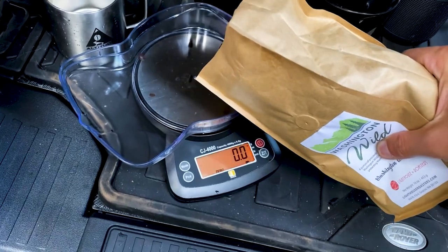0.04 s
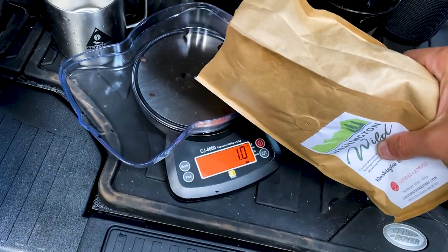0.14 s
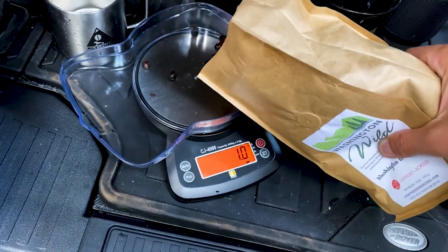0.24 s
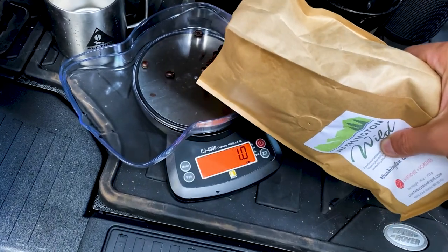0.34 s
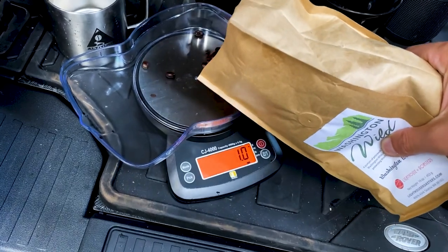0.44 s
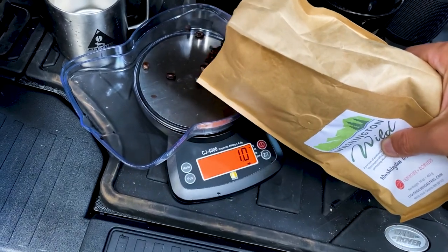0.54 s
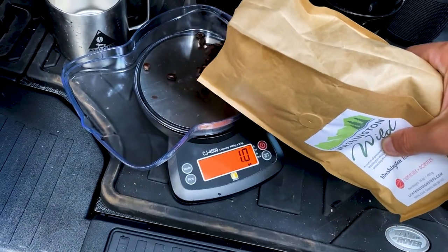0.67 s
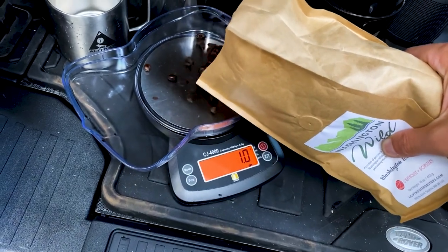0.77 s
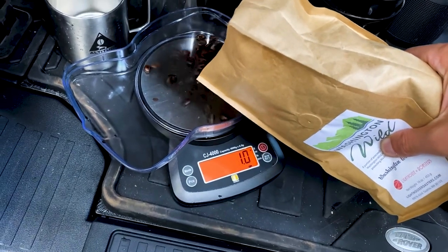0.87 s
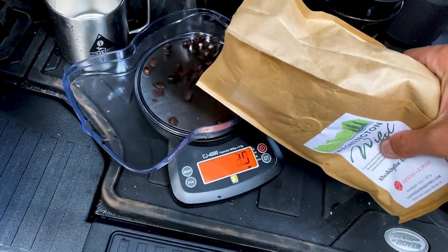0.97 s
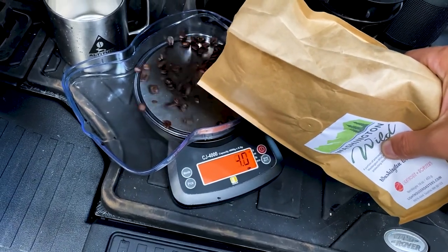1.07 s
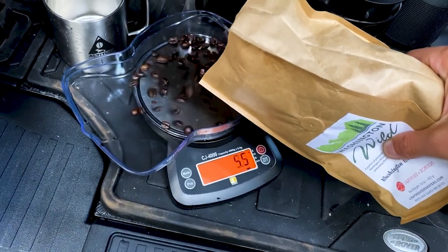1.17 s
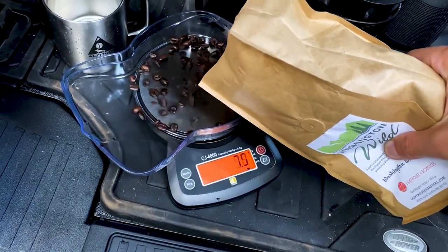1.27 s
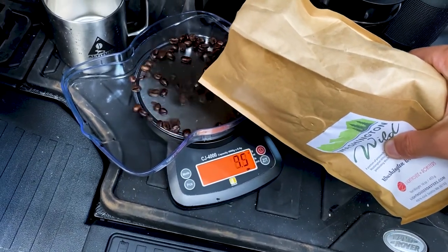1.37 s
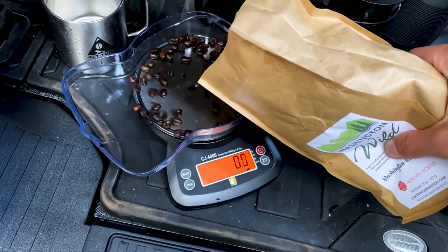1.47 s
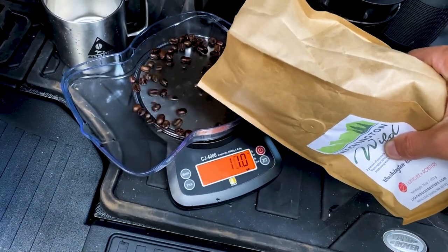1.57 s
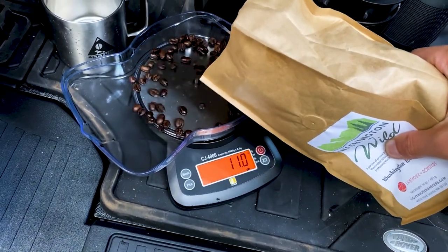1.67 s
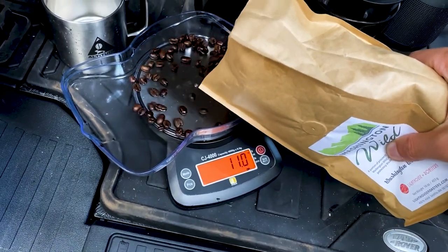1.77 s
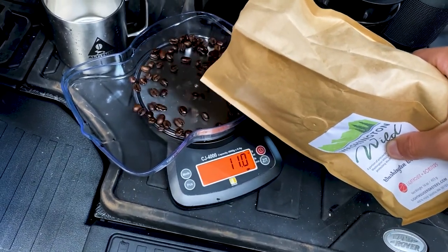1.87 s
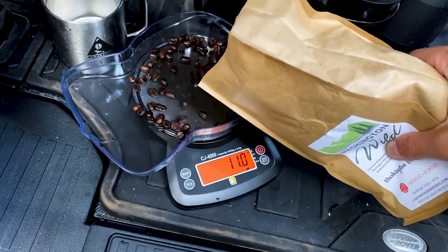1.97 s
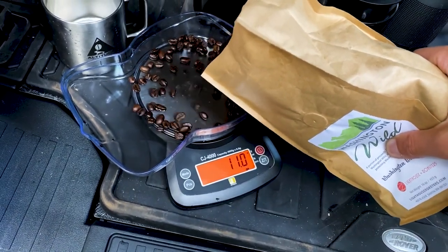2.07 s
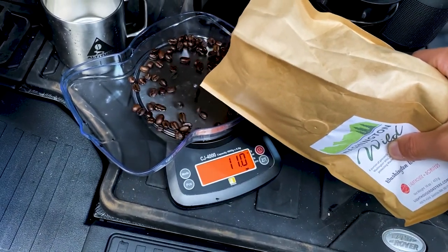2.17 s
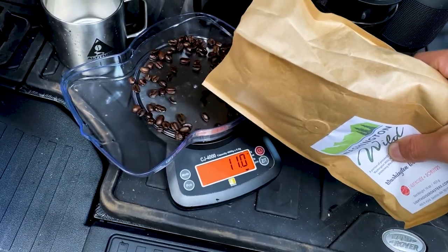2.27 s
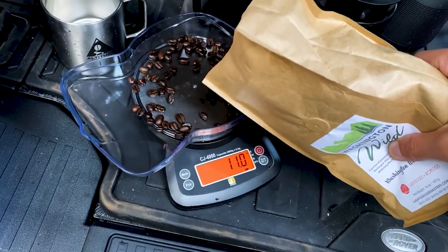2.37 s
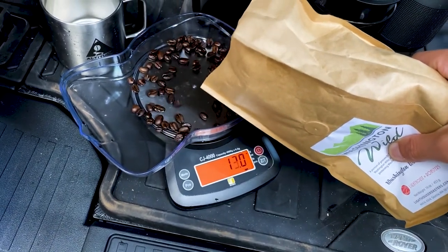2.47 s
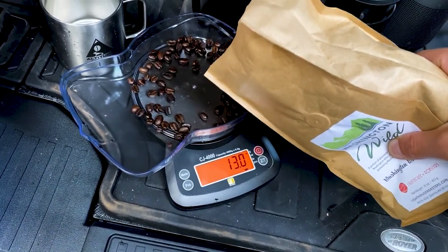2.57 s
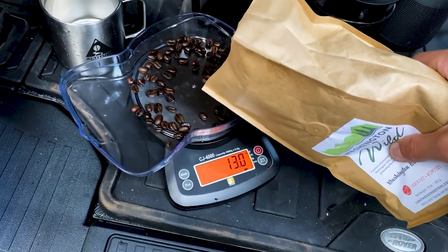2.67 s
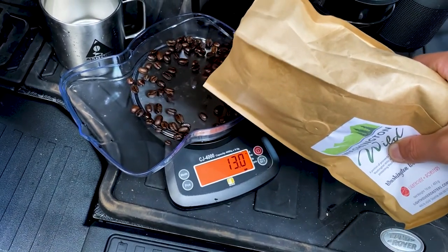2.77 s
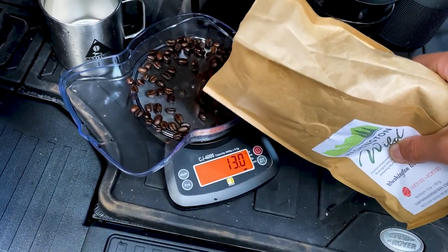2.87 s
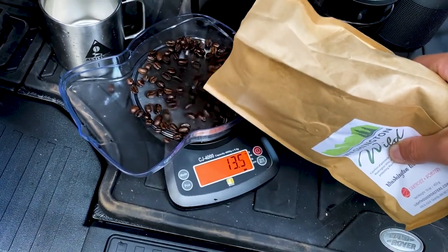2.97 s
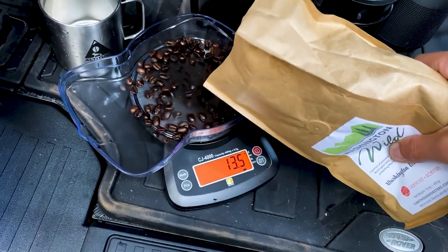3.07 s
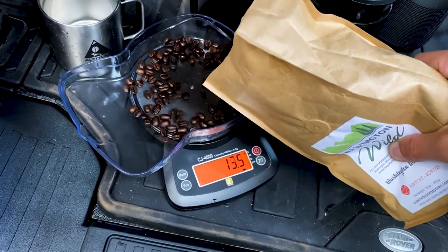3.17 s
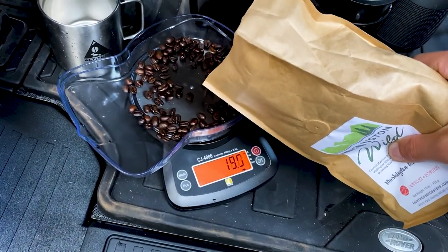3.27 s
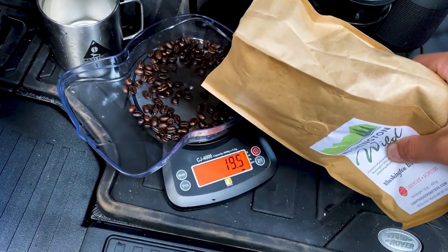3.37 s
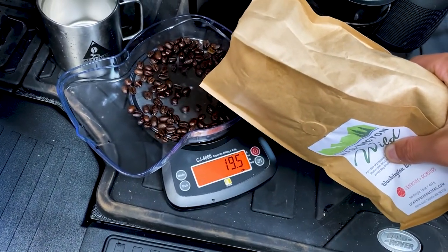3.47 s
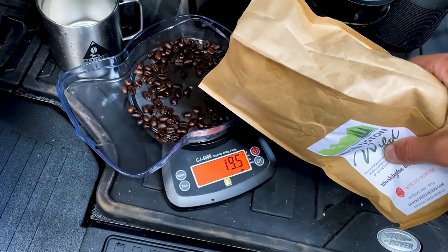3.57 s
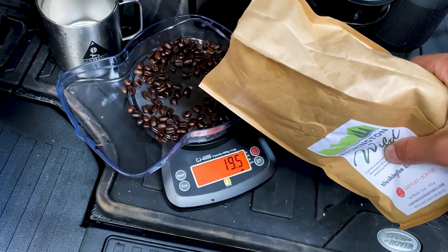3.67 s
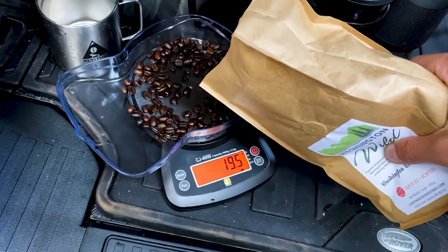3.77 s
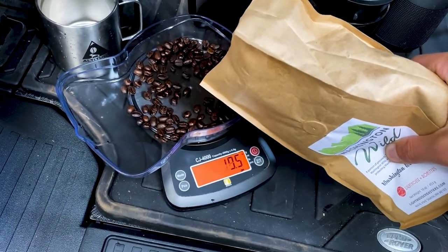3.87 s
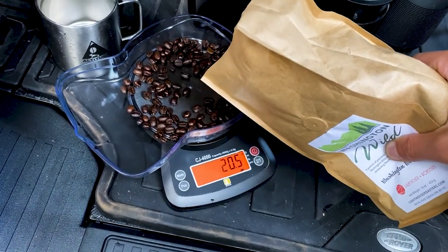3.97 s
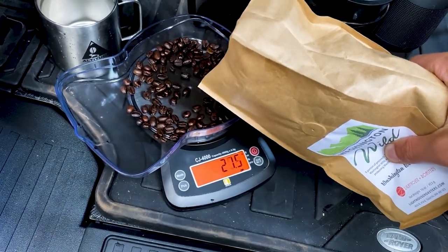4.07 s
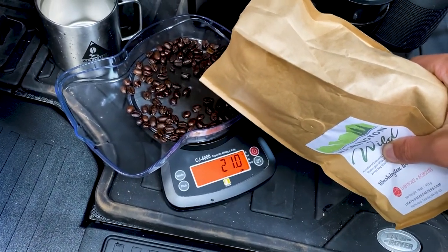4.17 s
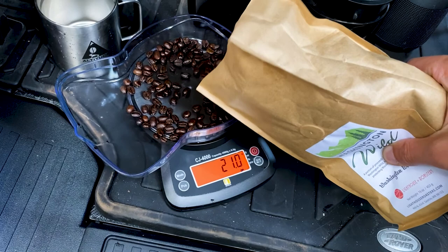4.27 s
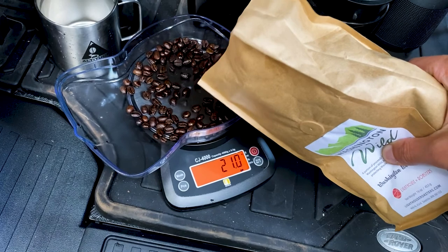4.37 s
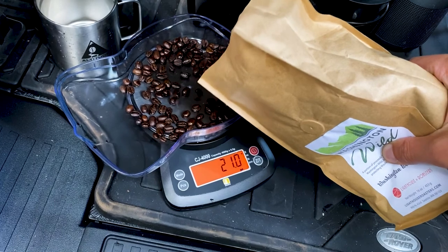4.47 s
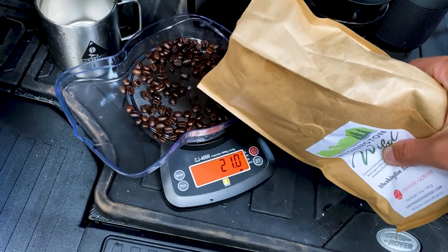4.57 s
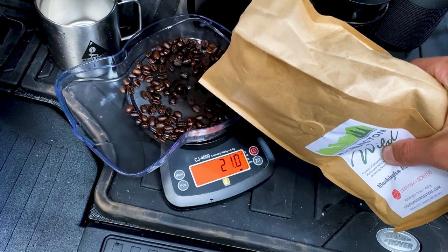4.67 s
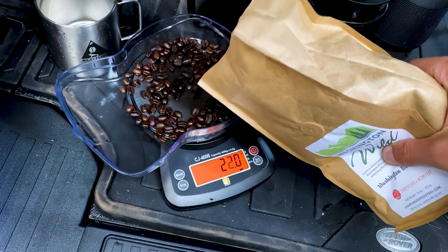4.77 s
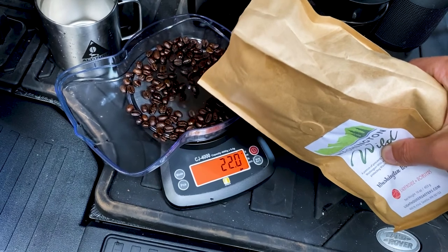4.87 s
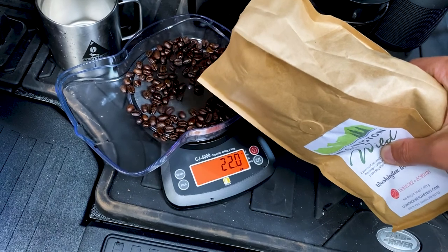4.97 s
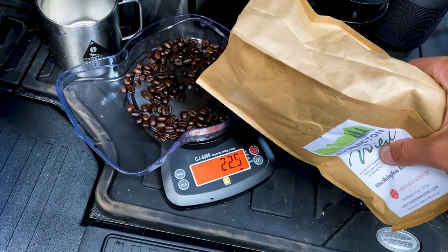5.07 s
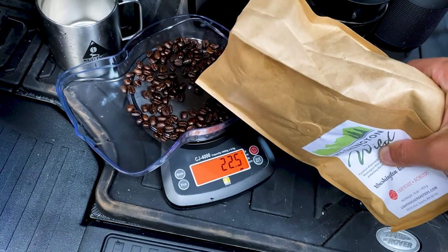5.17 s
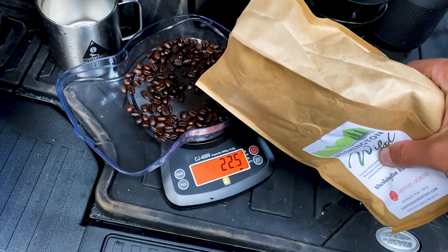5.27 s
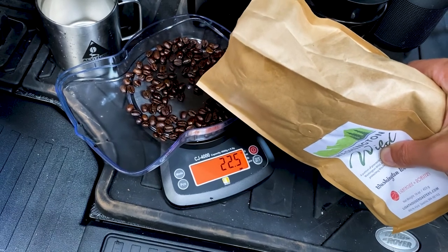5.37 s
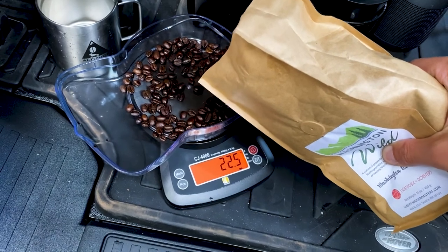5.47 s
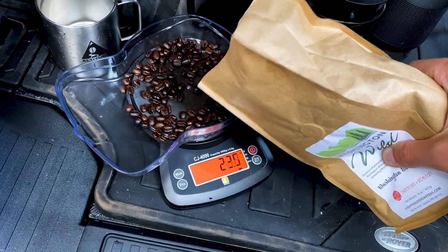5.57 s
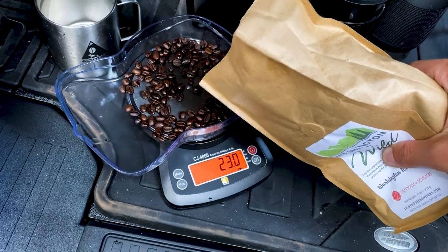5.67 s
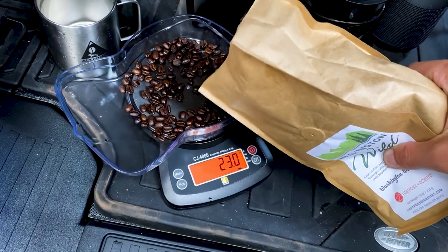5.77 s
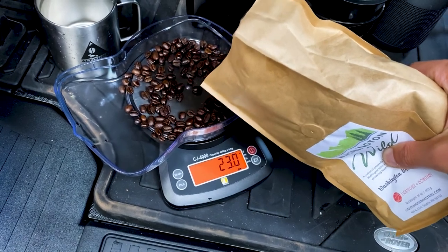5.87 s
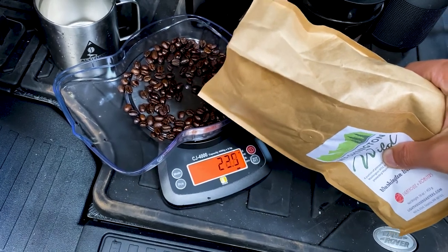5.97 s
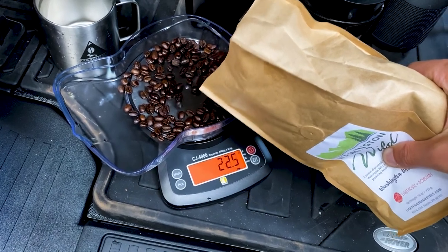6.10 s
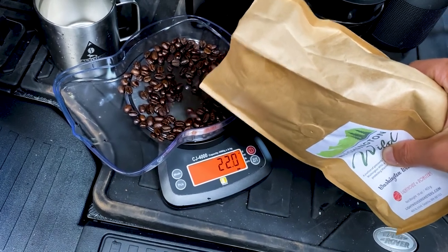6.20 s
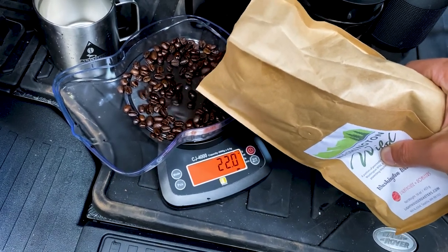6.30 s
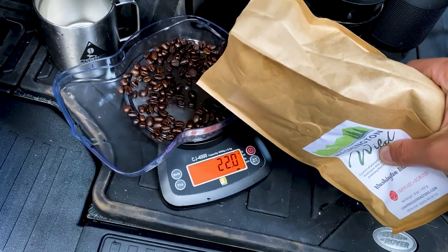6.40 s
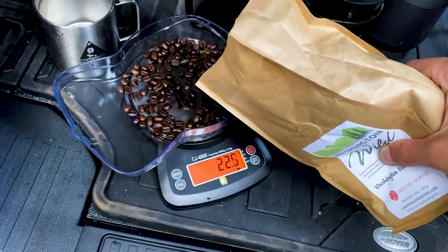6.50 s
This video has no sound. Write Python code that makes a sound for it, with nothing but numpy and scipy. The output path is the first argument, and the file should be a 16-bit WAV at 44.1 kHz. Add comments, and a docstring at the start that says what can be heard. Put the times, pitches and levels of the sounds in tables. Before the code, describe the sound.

Close, dry stereo in a still car cabin with faint low air. From 0 s coffee beans fall from a paper bag into a thin plastic tray, scattered sharp cracks over soft low handling bumps. From about 0.7 to 1.8 s they thicken into a dense, crisp rattle, each hit ringing briefly and hopping. Looser clatter continues to 2.45 s, then a short lull. At 2.8 s a hard burst arrives, strongest near 3 s, thinning into separate knocks until 3.6 s, with a hollow rub of beans in the bag. Near quiet follows from 3.8 s; a paper tick at 4.3 s leads to another spurt from 4.4 to 4.95 s. It dies to tiny clicks. In the lull, a barely audible far bird gives gliding whistles at 5.3-5.7 s, and paper ticks near 5.9 s. A last short clatter runs from 6.15 to 6.4 s, fading at 6.5 s.

```python
"""Roasted coffee beans are shaken in spurts from a paper bag into a thin plastic tray on a scale, in a quiet car.
Each bean lands with a dry crack of noise, a duller wash and decaying sine modes of the tray, then hops once.
Other beans tumble among them in random small collisions. In the bag, beans slide with a hollow rub,
crackle the paper and tick against it. Soft bumps and low handling rumble lie underneath, as short sine swells
and coloured noise, over still cabin air; a faint, far bird whistles in gliding notes."""
import sys
import numpy as np
from scipy import signal
from scipy.fft import rfft, irfft
from scipy.io import wavfile

SR = 44100
rng = np.random.default_rng(int(sys.argv[2]) if len(sys.argv) > 2 else 0)


def wrap_up_sound(samples):
    """Save the sound to the file named by the first command line argument, as 16-bit audio."""
    columns = np.atleast_2d(samples).T
    # keep every value between -1 and 1, then stretch to whole-number steps
    tamed = np.clip(columns, -1, 1)
    steps = np.round(tamed * 32767).astype(np.int16)
    wavfile.write(sys.argv[1], SR, steps)


N = 288414
STRIKE_SIZE = 6144  # samples in one strike or tick


def from_db(db):
    """Decibels to gain."""
    return 10 ** (np.asarray(db) / 20)


def in_time(rows):
    """Draws straight lines between (s, value) rows, giving a value at every sample."""
    return np.interp(np.arange(N) / SR, *np.transpose(rows))


def at_hz(points, hz):
    """Reads a spectrum on a log-frequency axis."""
    knots, values = np.transpose(points)
    return np.interp(np.log(hz + 1e-9), np.log(knots), values)


def cut(x, hz, kind, order=2):
    """Butterworth low- or high-pass."""
    return signal.sosfilt(signal.butter(order, min(hz, .45 * SR), kind, fs=SR, output="sos"), x)


# Likeness of the two microphone ports. Each row: frequency in Hz, correlation from 0 to 1.
PORT_LIKENESS = [(500, 0.7), (2500, 0.47), (5200, 0.32), (8000, 0.98)]
# Balance of the ports. Each row: frequency in Hz, left minus right in dB.
PORT_BALANCE = [(100, -0.5), (1500, -2), (6000, -2.5), (8000, 0.5)]


def noise(spectrum, size, bumps_db=0):
    """Stereo noise of rms 1 with the given colour and random broad bumps in its spectrum."""
    hz = np.fft.rfftfreq(size, 1 / SR)
    mid, side = rfft(rng.standard_normal((2, size)))
    alike = np.clip(at_hz(PORT_LIKENESS, hz), 0, 1)
    signs = np.array([[1], [-1]])  # left, right
    pair = np.sqrt(1 + alike) * mid + np.sqrt(1 - alike) * side * signs
    knots = np.geomspace(500, 16000, 22)
    bump_curve = np.interp(hz, knots, rng.standard_normal(len(knots)))
    colour_db = at_hz(spectrum, hz) + bumps_db * bump_curve + signs * at_hz(PORT_BALANCE, hz) / 2
    x = irfft(pair * from_db(colour_db), size)
    return x / np.sqrt(np.mean(x ** 2))


def play(hits, strikes, split_hz=6800):
    """Lays a strike at each (s, dB, tilt dB); a positive tilt lifts the treble, a negative one dulls it."""
    body = cut(strikes, split_hz, "low", order=1)
    treble = strikes - body
    out = np.zeros((2, N + STRIKE_SIZE))
    for k, (s, level_db, tilt_db) in enumerate(hits):
        at = int(np.clip(s * SR, 0, N - 1))
        spot = k % len(strikes)
        tilt = from_db(np.clip(tilt_db, -10, 10))
        tilted = (body[spot] + tilt * treble[spot]) / np.sqrt((1 + tilt ** 2) / 2)
        out[:, at:at + STRIKE_SIZE] += from_db(level_db) * tilted
    return out[:, :N]


# Colour of the still air in the car. Each row: frequency in Hz, relative level in dB per Hz.
CABIN_COLOUR = [(30, -2.5), (60, 9.5), (250, -7), (600, -9), (1500, -23), (5000, -43.5), (15000, -45)]


def cabin_air(level_db):
    """The still air of the cabin is steady, mostly low noise."""
    return from_db(level_db) * noise(CABIN_COLOUR, N)


# Swell of the handling rumble. Each row: time in seconds, relative level in dB.
RUMBLE_SWELL = [(0, -40), (.56, -50.5), (.68, -53), (2.45, -64), (2.95, -48), (3.15, -63.5), (4.6, -67),
                (4.95, -62), (5.2, -76), (5.95, -58.5), (6.54, -80)]
# Colour of the rumble. Each row: frequency in Hz, relative level in dB per Hz.
RUMBLE_COLOUR = [(20, -25.5), (52, 1), (100, -4.5), (170, -12), (400, -43), (2000, -75.5)]


def handling_rumble(trim_db):
    """Handling makes a deep noise that rises and sinks along its swell."""
    return from_db(in_time(RUMBLE_SWELL) + trim_db) * noise(RUMBLE_COLOUR, N)


# Calls of the far bird. Each row: start in seconds, level in dB.
BIRD_CALLS = [(5.285, -75), (5.485, -73), (5.69, -73)]
# The rising and the falling note of a call. Each row: delay in seconds, length in seconds,
# first pitch in Hz, last pitch in Hz, level within the call in dB.
BIRD_NOTES = [(0, .05, 4150, 4480, -8), (.055, .06, 4680, 4400, 0)]


def bird():
    """Each note is a thin, gliding whistle that swells and fades."""
    out = np.zeros(N)
    for s, call_db in BIRD_CALLS:
        for delay, length, first_hz, last_hz, note_db in BIRD_NOTES:
            hz = np.linspace(first_hz, last_hz, int(length * SR))
            at = int((s + delay) * SR)
            whistle = np.hanning(len(hz)) * np.sin(2 * np.pi * np.cumsum(hz) / SR)
            out[at:at + len(hz)] += from_db(call_db + note_db) * whistle
    return out


# Soft bumps of the hand jogging the bag, and of beans shifting in it.
# Each row: centre in seconds, peak of the swell in dB, pitch in Hz.
BUMPS = [(0.019, -31, 79.4), (.096, -25.5, 64.5), (0.18, -33, 63), (0.36, -31, 58.6), (.461, -36.5, 67.4),
         (1.802, -39, 111), (2.104, -41.5, 189.9), (2.222, -38, 244), (2.724, -41, 299),
         (2.917, -30, 102.3), (3.017, -36, 112.2), (3.952, -42, 58), (4.347, -45, 296)]


def bumps(cycles):
    """Each bump is a low swell a cycle or two long, at a random phase."""
    out, t = np.zeros(N), np.arange(N) / SR
    for s, peak_db, hz in BUMPS:
        near = abs(t - s) < .1
        turns = (t[near] - s) * hz
        swell = from_db(peak_db) * np.exp(-(turns / cycles) ** 2)
        out[near] += swell * np.sin(2 * np.pi * (turns + rng.random()))
    return out


# Beans sliding in the paper bag. Each row: time in seconds, level of the rub before its scuffs in dB.
BAG_SLIDE = [(0, -49), (2.6, -58), (2.72, -49.5), (3.7, -58.5), (3.97, -80.5), (4.2, -76), (4.31, -52),
             (4.42, -64), (5.1, -65.5), (5.25, -89), (5.5, -76.5), (5.8, -68), (5.91, -57.5), (6.54, -56.5)]
# Hollow rub of the bag. Each row: frequency in Hz, relative level in dB per Hz.
BAG_BODY = [(100, -13.5), (290, -1), (420, -9.5), (800, -7), (1450, -6.5), (1900, -10), (5000, -15),
            (12000, -43)]
# Crackle of its paper. Each row: frequency in Hz, relative level in dB per Hz.
PAPER_COLOUR = [(500, -23.5), (1400, 3.5), (6000, -4.5), (13000, -9.5)]


def bag(per_s, grain_s, spread_db, crackle_db, steepness, scuff_s, scuff_db):
    """Beans slide in uneven scuffs with a hollow rub; the stronger the slide, the more the paper crackles."""
    beats = np.arange(0, N / SR, scuff_s)
    scuffs = np.interp(np.arange(N) / SR, beats, rng.uniform(-1, 1, len(beats)))
    slide_db = in_time(BAG_SLIDE)
    # the paper slips at random moments, and each slip dies away as a grain
    slip_power = from_db(spread_db * np.minimum(rng.exponential(1, N), 3)) ** 2
    slips = (rng.random(N) < per_s / SR) * slip_power
    power = signal.lfilter([1], [1, -np.exp(-1 / (grain_s * SR))], slips + 1e-18)
    crackle_gain = from_db(crackle_db + steepness * (slide_db - slide_db.max()))
    crackle = crackle_gain * np.sqrt(power / power.mean()) * noise(PAPER_COLOUR, N)
    rub = from_db(slide_db) * noise(BAG_BODY, N)
    return from_db(scuff_db * scuffs) * (rub + crackle)


# Single beans knocking against the paper inside the bag. Each row: start in seconds, relative level in dB.
BAG_KNOCKS = [(2.6354, -55), (4.3286, -29), (4.3849, -45), (5.6575, -59), (5.8331, -42), (5.8714, -37),
              (5.9125, -30.5), (6.0277, -34), (6.106, -38)]


def bag_knocks(trim_db, t60):
    """A bean against the paper gives a short, dead tick."""
    t = np.arange(STRIKE_SIZE) / SR
    fade = from_db(-60 * t / t60)
    ticks = np.array([noise(PAPER_COLOUR, STRIKE_SIZE, bumps_db=4.0) * fade for _ in BAG_KNOCKS])
    return play([(s, level_db + trim_db, 0) for s, level_db in BAG_KNOCKS], ticks)


# Crack of a bean on plastic. Each row: frequency in Hz, relative level in dB per Hz.
CRACK_COLOUR = [(300, -16.5), (750, -16.5), (1150, -7.5), (2500, -5), (4200, 1.5), (6500, 0.5), (7900, 2.5),
                (9500, 0), (14000, -2.5), (15700, -7.5)]
# Ringing of the tray. Each row: frequency in Hz, relative level in dB, 60 dB decay time in seconds.
TRAY_MODES = [(376, -38.5, 0.16), (453.7, -32.5, 0.13), (951.3, -21, 0.095), (1282, -28, 0.02),
              (1283, -13.5, 0.029), (1828, -18, 0.035), (2059, -17.5, 0.06), (2880, -18.5, 0.047),
              (3130, -19.5, 0.064), (3874, -8.5, 0.029), (4090, -16, 0.087), (4730, -17.5, 0.055),
              (6670, -6.5, 0.013), (7865, -2, 0.021)]


def bean_strike(crack_t60, tail_t60, tail_db, dull_hz, modes_db, spread_db, right_db):
    """One bean on one spot: a bright crack, a duller wash of dense modes and the tray's main modes."""
    t = np.arange(STRIKE_SIZE) / SR
    swell = 1 - np.exp(-t / 0.00037)
    # the crack holds while the bean touches, then falls away; some beans are snappier than others
    fall_s = crack_t60 * from_db(2 * rng.standard_normal())
    snap = from_db(-60 * np.maximum(t - .0008, 0) / fall_s)
    colour = noise(CRACK_COLOUR, STRIKE_SIZE, bumps_db=4.0)
    wash = cut(colour, dull_hz, "low", order=1) * from_db(tail_db - 60 * t / tail_t60)
    # the wash takes over as the crack falls
    crack = cut(swell * (colour * snap + wash * (1 - snap)), 412, "high")
    crack /= np.sqrt(np.mean(crack[:, t < .003] ** 2))
    hz, level_db, t60 = np.transpose(TRAY_MODES)[:, :, None]
    # the spot decides how strongly, and with which sign, each mode answers
    strength = from_db(level_db + modes_db + spread_db * rng.standard_normal(hz.shape))
    strength *= rng.choice([-1, 1], hz.shape)
    ring = np.sum(strength * np.sin(2 * np.pi * hz * t) * from_db(-60 * t / t60), axis=0)
    return crack + ring * swell * from_db([[0], [right_db]])


# Each shake of the bag lets out a spurt of beans.
# Each row: start in seconds, full flow in seconds, running out in seconds, relative level in dB.
SPURTS = [(0.099, 0.23, 0.075, -36), (.72, .65, .45, -18), (1.9, 0.36, .11, -27), (2.41, 0.16, 0.098, -30),
          (2.94, 0.099, 0.43, -16.5), (3.28, 0.087, 0.017, -26), (3.44, .27, 0.05, -36),
          (4.51, .12, 0.067, -29), (4.7, 0.12, 0.22, -24.5), (6.24, 0.14, 0.21, -30)]
RUN_OUT_DB = 19  # how far the flow sinks before the last bean lies still


def tumbling(per_s, crowding, level_db, spread_db, tilt_db, settle_db, settle_s):
    """A spurt holds, then runs out; more flow makes collisions denser and harder, and landings stir them up."""
    landed = np.sort(np.append(np.array(LANDINGS)[:, 0], 0))
    hits = []
    for start, full_s, run_out_s, spurt_db in SPURTS:
        s = start + np.arange(0, full_s + run_out_s, .001)
        flow_db = spurt_db - RUN_OUT_DB * np.maximum(s - start - full_s, 0) / run_out_s
        rate = per_s * from_db(crowding * (flow_db + 25))
        # each bean waits its turn, so the collisions are uneven but seldom leave long gaps
        turn = np.cumsum(rate) * (s[1] - s[0])
        slots = np.arange(1000) + rng.uniform(-1, 1, 1000)
        size, tilt = rng.standard_normal((2, len(slots)))
        when = np.interp(slots, turn, s)
        # collisions are hardest right after a landing, then settle
        since_landing = when - landed[np.searchsorted(landed, when, side="right") - 1]
        calm = 1 - np.exp(-since_landing / settle_s)
        # the flow's power is shared among its collisions
        share_db = np.interp(when, s, flow_db - 10 * np.log10(rate / per_s))
        hit_db = share_db + level_db + settle_db * calm + spread_db * np.minimum(size, 1.6)
        rows = np.column_stack([when, hit_db, tilt_db + 4 * tilt])
        hits.append(rows[slots < turn[-1]])
    return np.vstack(hits)


# Beans whose landings stand out, by being loud or by falling in a quiet moment.
# Each row: start in seconds, relative level in dB, treble against that level in dB.
LANDINGS = [(0.011, -17, -1), (0.0415, -3.5, -16), (0.0497, -12, -15.5), (0.0641, -11, -7),
            (0.066, -5.5, -16), (0.1019, -13, -6.5), (0.1288, -14.5, -11), (0.1844, -7.5, -13),
            (0.2447, -15, -15.5), (0.2668, -27, -17.5), (0.2876, -26, -15), (0.3195, -19.5, -10.5),
            (0.401, 0.5, -14.5), (0.4105, -2, -16), (0.4229, -5.5, -18.5), (0.4814, -7, -12.5),
            (0.49, -11, -16), (0.516, -2.5, -11.5), (0.533, -10, -14), (0.5691, -5, -16.5),
            (0.5756, -9, -14), (0.6, -8.5, -15), (0.6155, -9.5, -12), (0.6799, -2, -15.5),
            (0.6954, -2.5, -19.5), (0.7174, 1.5, -14), (0.7269, -1, -15.5), (0.8167, 0, -14.5),
            (0.8312, -2, -10.5), (0.8454, -5.5, -10.5), (0.8704, -6.5, -12.5), (0.9188, -0.5, -12.5),
            (0.9517, -2, -13), (1.0156, 1, -14), (1.0541, 2.5, -17), (1.0784, -11.5, -10.5),
            (1.112, -4.5, -12.5), (1.1305, -1, -16.5), (1.2103, -2.5, -11.5), (1.258, 1.5, -13),
            (1.2664, 0, -16), (1.2963, -9, -8.5), (1.3424, -3.5, -14.5), (1.4272, -2.5, -14.5),
            (1.4636, -22, -5), (1.5417, -8.5, -12), (1.5543, -2.5, -14.5), (1.6217, -9.5, -14.5),
            (1.6632, -20, -16.5), (1.689, -7.5, -14.5), (1.7882, -4.5, -14.5), (1.8628, -4, -12),
            (1.9072, -1, -14.5), (1.948, -5.5, -18), (1.979, -5, -18.5), (2.02, -10.5, -13),
            (2.0434, -6, -16), (2.1009, -7, -12), (2.1534, -0.5, -15), (2.1761, -1.5, -15.5),
            (2.2112, -11.5, -11), (2.2446, -2, -13), (2.293, -2, -9.5), (2.3144, -12, -14),
            (2.3617, -11, -13), (2.4108, -16.5, -3), (2.4406, -10, -18), (2.532, -38, -5),
            (2.5714, -35, -9), (2.795, -1.5, -11), (2.8019, -7, -20.5), (2.833, -23.5, -8),
            (2.859, -12.5, -11), (2.8888, -8, -17.5), (2.9052, -1, -14), (2.9238, -3.5, -15),
            (2.9432, 0, -10), (2.9504, -4.5, -13.5), (2.9791, 4, -11.5), (3.046, -13.5, -16),
            (3.0527, -11.5, -14.5), (3.0857, -5, -12.5), (3.1381, -3.5, -17), (3.2073, -11, -12),
            (3.2762, -1.5, -13), (3.3104, -3.5, -11), (3.3426, -3, -14.5), (3.3665, -6, -8),
            (3.4196, -0.5, -13), (3.4234, -10, -13), (3.4729, -8, -26.5), (3.5255, -13, -16),
            (3.5684, 0.5, -10), (3.6321, -23, -15), (3.6497, -17.5, -14.5), (3.7486, -23, -9.5),
            (3.7854, -23, -9), (4.4185, -5, -14), (4.466, -1.5, -17.5), (4.4893, -21, -10),
            (4.5049, -10.5, -17), (4.5183, -10.5, -7), (4.6349, -8.5, -17), (4.6674, -2.5, -12),
            (4.705, -7, -8), (4.7249, -6, -12.5), (4.74, -9.5, -7.5), (4.782, -4.5, -12.5),
            (4.8231, -10, -10.5), (4.8381, -0.5, -17), (4.9158, -26.5, -6.5), (4.9357, -5, -14),
            (5.011, -20, -15), (5.024, -30.5, -21), (5.0433, -27, -24), (5.1151, -32.5, -32.5),
            (5.1221, -30.5, -26), (5.15, -35.5, -31.5), (6.1594, -3.5, -14), (6.2206, -7.5, -11.5),
            (6.2446, -3.5, -13.5), (6.2673, -6, -14), (6.2849, -5, -12), (6.3515, -4.5, -10.5),
            (6.3962, -7, -4), (6.4787, -26.5, -30.5)]
HOP_S, HOP_LOSS_DB = .012, 17  # typical flight time of a hop in seconds, mean loss of level in dB


def landing(trim_db, tilt_db, brightness_scale):
    """Each bean lands with its own brightness, then comes down once more from a small hop."""
    s, peak_db, treble_db = np.transpose(LANDINGS)
    flight, loss = rng.standard_normal((2, len(s)))
    level_db = peak_db + trim_db
    tilt = tilt_db + brightness_scale * (treble_db - treble_db.mean())
    first = np.column_stack([s, level_db, tilt])
    hop_s = s + HOP_S * np.exp(.35 * flight)
    hop = np.column_stack([hop_s, level_db - HOP_LOSS_DB + 7.5 * loss, tilt])
    return np.vstack([first, hop])


def scene(count=96):
    """Landings crack, tumbling beans stir the tray's ring more; the bag, the cabin and a far bird lie behind."""
    air = cabin_air(level_db=-62) + handling_rumble(trim_db=-0.9)
    paper = bag(per_s=43, grain_s=0.0034, spread_db=3.5, crackle_db=-46, steepness=1.5,
                scuff_s=0.032, scuff_db=4.0)
    knocks = bag_knocks(trim_db=-6.5, t60=0.024)
    rolls = np.array([bean_strike(crack_t60=0.015, tail_t60=0.055, tail_db=-7.5, dull_hz=5000,
                                  modes_db=-2.5, spread_db=4.0, right_db=2.5) for _ in range(count)])
    tumble = play(tumbling(per_s=220, crowding=.55, level_db=1.5, spread_db=4.0, tilt_db=0.0,
                           settle_db=-5.0, settle_s=0.0071), rolls)
    falls = np.array([bean_strike(crack_t60=0.02, tail_t60=0.063, tail_db=-9.5, dull_hz=7690,
                                  modes_db=-5.0, spread_db=5.0, right_db=3.5) for _ in range(count)])
    landings = play(landing(trim_db=-8.5, tilt_db=2.0, brightness_scale=1.5), falls)
    return air + bird() + bumps(cycles=0.71) + paper + knocks + tumble + landings


# Phase between the two microphone ports. Each row: frequency in Hz, lead of the left in radians.
PORT_PHASE = [(2000, 0), (5000, -.8), (6600, .1), (7700, 2), (9150, 3.14), (11800, 6.1), (13000, 6.7),
              (15500, 9.5)]
CUTOFF_HZ = 15900


def record(dry):
    """The ports shift the treble between the sides, peaks are rounded, the top is cut."""
    lead = np.interp(np.fft.rfftfreq(N, 1 / SR), *np.transpose(PORT_PHASE))
    heard = irfft(rfft(dry) * np.exp(-1j * lead * np.array([[0], [1]])), N)
    rounded = np.tanh(heard)
    return signal.sosfilt(signal.ellip(10, .2, 80, CUTOFF_HZ, fs=SR, output="sos"), rounded)


dry = scene()
out = record(dry)
wrap_up_sound(out)
```